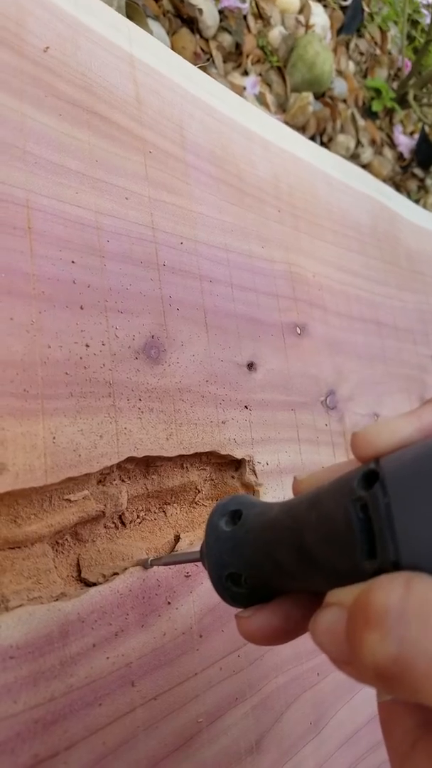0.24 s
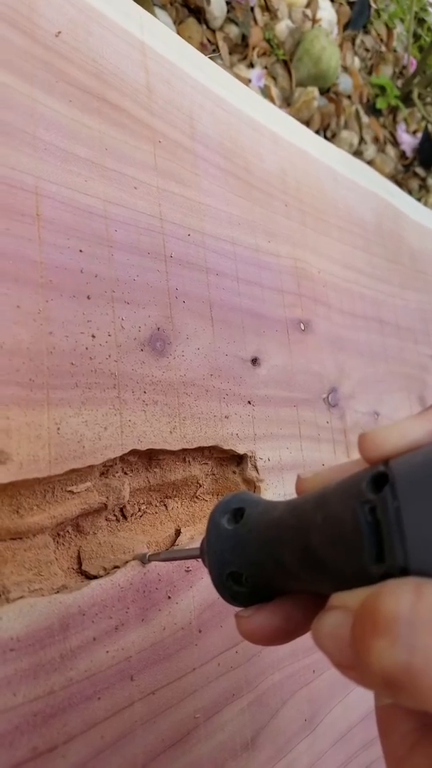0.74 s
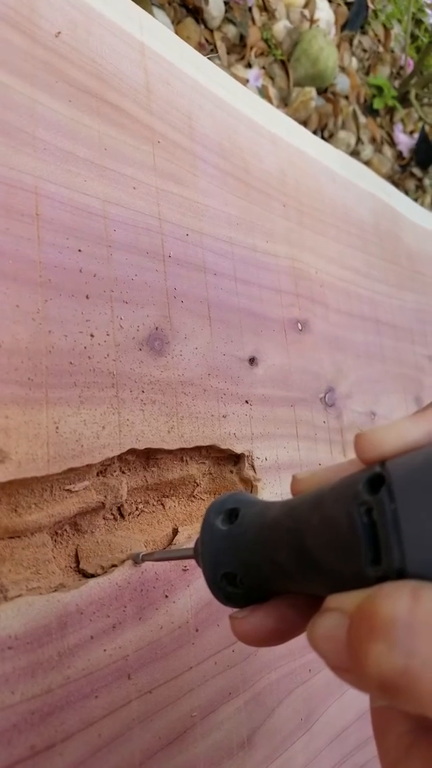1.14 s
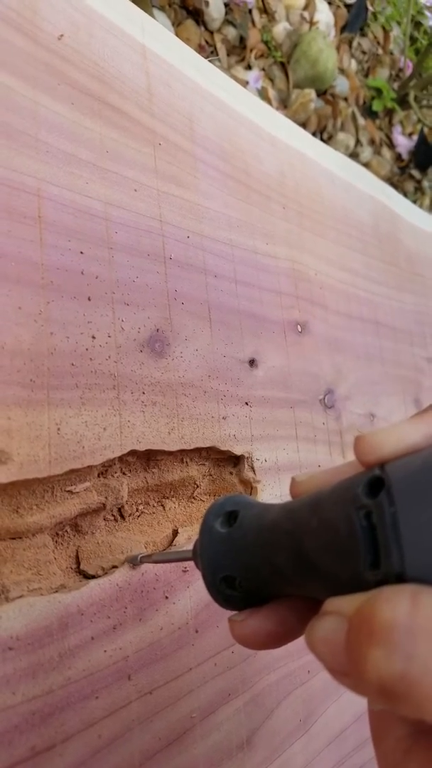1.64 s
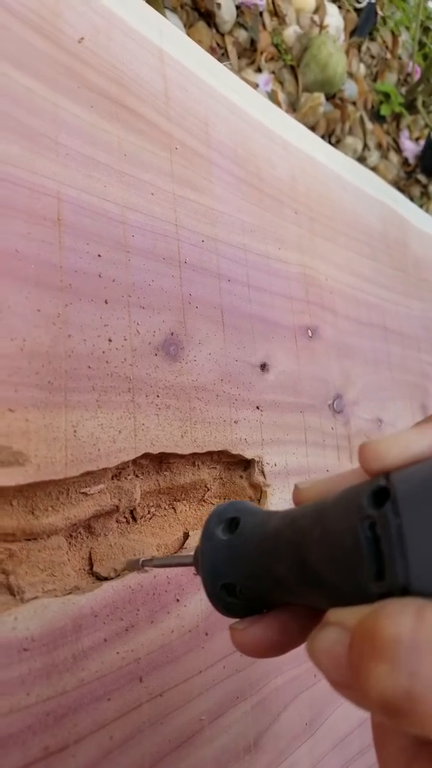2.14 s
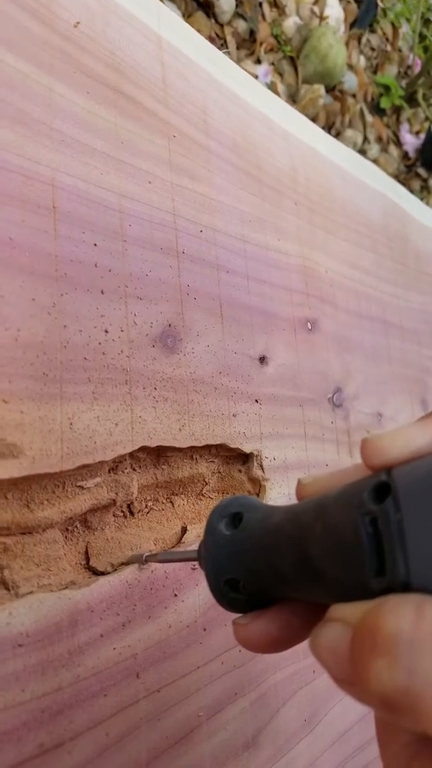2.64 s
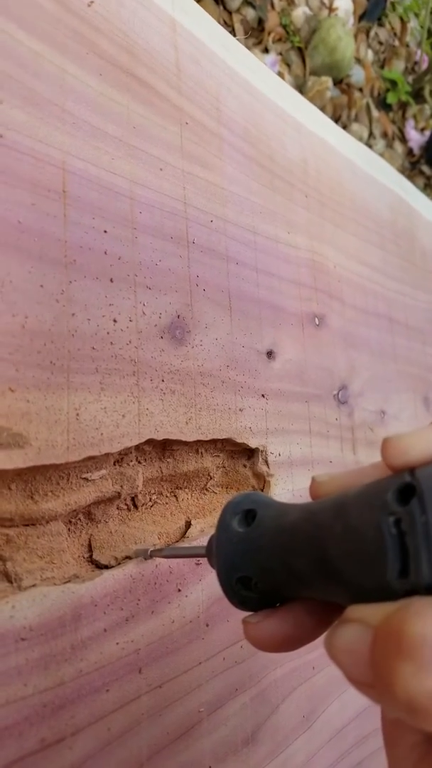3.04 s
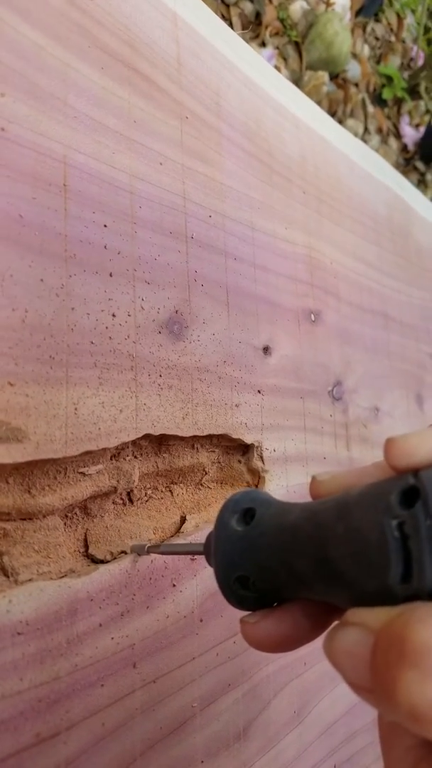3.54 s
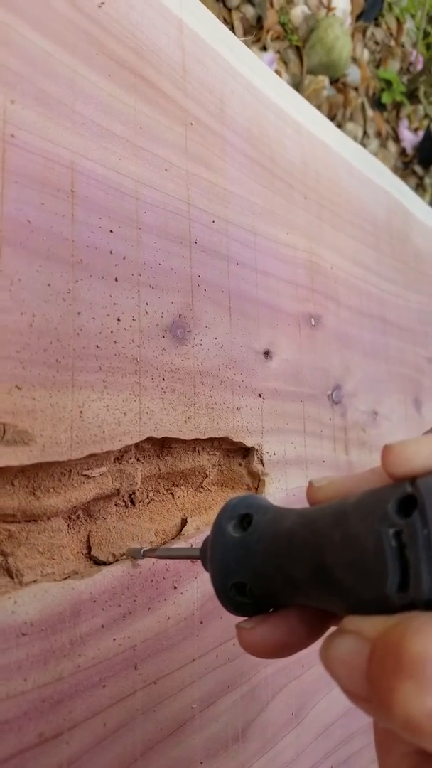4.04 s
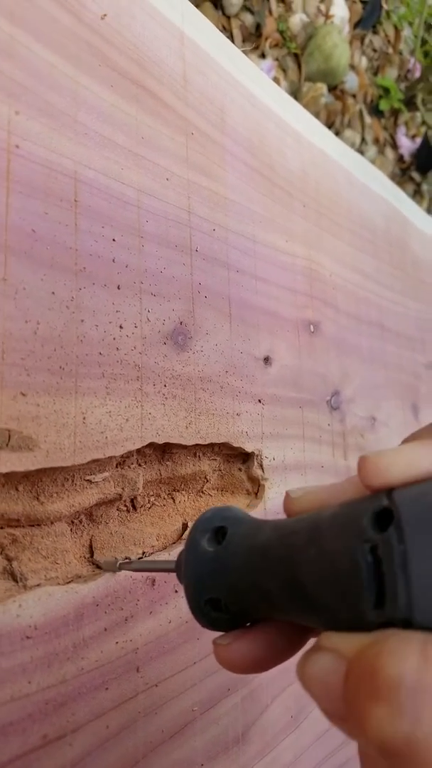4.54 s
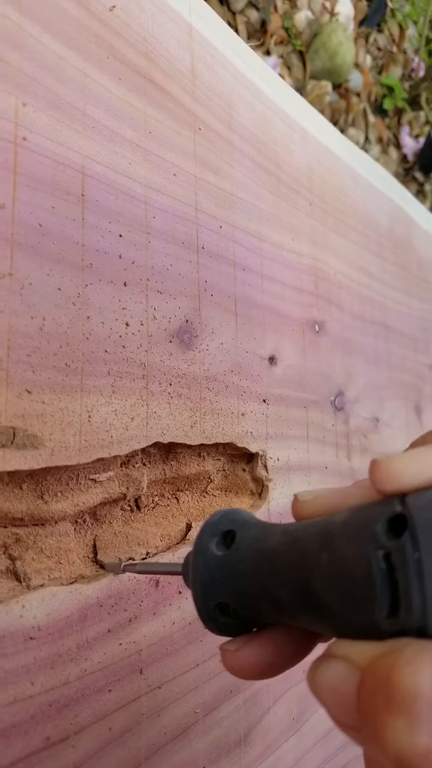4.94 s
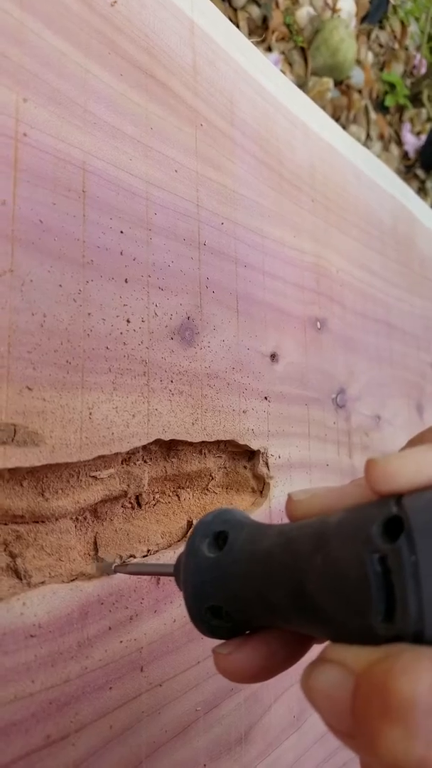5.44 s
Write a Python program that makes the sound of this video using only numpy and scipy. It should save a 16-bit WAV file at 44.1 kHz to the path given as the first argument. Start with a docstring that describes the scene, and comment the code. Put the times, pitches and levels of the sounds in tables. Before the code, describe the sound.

A handheld rotary tool whines and rasps through wood close up, bogging into a harsh squeal once, with faint traffic rumble behind.

```python
"""Outdoors, a handheld rotary tool carves a wooden slab.
The burr knocks as it turns, torn chips rattle slab, shank and housing, and snags add ring and dust.
Multiples of the turn rate make the spindle hum, the slab's drone, the flutes' whine and the shank's squeal.
Behind it, shaped noise makes far traffic rumble and steady drones; gliding notes are a far engine revving."""
import sys
import numpy as np
from scipy import signal
from scipy.fft import rfft, irfft, next_fast_len
from scipy.io import wavfile

SR = 44100
rng = np.random.default_rng(int(sys.argv[2]) if len(sys.argv) > 2 else 0)


def pcm_store(signal):
    """Save signal as 16-bit PCM."""
    levels = np.round(np.clip(np.atleast_2d(signal), -1, 1) * 32767)
    wavfile.write(sys.argv[1], SR, levels.astype(np.int16).T)


N = 250488
SIZE = next_fast_len(N + 4096)
HZ = np.arange(SIZE // 2 + 1) * SR / SIZE
T = np.arange(N) / SR
HALF_SIDE = np.array([[.5], [-.5]])   # left, right


def from_db(db):
    """Amplitude ratio of a level in dB."""
    return 10 ** (np.asarray(db) / 20)


def rms_one(x):
    """Scale to an RMS of 1."""
    return x / np.sqrt(np.mean(x ** 2) + 1e-20)


def in_time(rows):
    """Interpolate each column of a table whose first column is time."""
    s, *columns = np.transpose(rows)
    return [np.interp(T, s, c) for c in columns]


def drift(rate_hz):
    """Slow random wander of RMS 1: noise through a two-pole lowpass."""
    r = np.exp(-2 * np.pi * rate_hz / SR)
    noise = rng.standard_normal(N + 9000)
    return rms_one(signal.lfilter([1], [1, -2 * r, r * r], noise)[9000:])


def swell(start_s, end_s, attack_s, release_s):
    """Gain 0-1: rises after the start, holds, reaches zero at the end."""
    return np.clip((T - start_s) / attack_s, 0, 1) * np.clip((end_s - T) / release_s, 0, 1)


def spells(rows, rest_db, ramp_s):
    """Steady gain at rest_db to which each row (start [s], end [s], added gain [dB]) adds a swell."""
    return from_db(rest_db) + sum(from_db(level_db) * swell(start_s, end_s, ramp_s, ramp_s)
                                  for start_s, end_s, level_db in rows)


def burst(s, level_db, ms):
    """Hann-shaped swell that starts at each time and peaks half its length later."""
    marks = np.zeros(N)
    marks[np.round(s * SR).astype(int)] = from_db(level_db)
    return signal.lfilter(np.hanning(int(ms * SR / 1000) + 2), [1], marks)


# Spindle speed before 0.1 % jitter: (time [s], speed [turns/s])
SPINDLE_SPEED = [(0.0, 158.4), (0.14, 162.4), (0.4, 159.2), (0.58, 161), (0.66, 158.4), (0.84, 162),
                 (0.97, 160.2), (1.04, 146.5), (1.1, 144.4), (1.15, 144), (1.18, 140.4), (1.225, 139.7),
                 (1.31, 141.4), (1.365, 139.6), (1.385, 141.2), (1.43, 139.6), (1.515, 141.6), (1.555, 153),
                 (1.63, 161.5), (1.85, 165.5), (1.88, 173), (1.93, 180.5), (1.96, 174), (2.02, 179),
                 (2.11, 189.5), (2.17, 177), (2.27, 169), (2.42, 165.5), (2.79, 164.5), (2.99, 161.4),
                 (3.47, 160), (3.72, 162.8), (3.88, 160), (4.14, 160), (4.22, 179), (4.25, 172.5),
                 (4.41, 172), (4.46, 177), (4.53, 172.8), (4.61, 165.2), (4.83, 159.6), (5.68, 158.2)]


def spindle():
    """Speed [turns/s] and the jittered turn angle [rad]."""
    speed, = in_time(SPINDLE_SPEED)
    turn = 2 * np.pi * np.cumsum(speed * (1 + .001 * drift(30))) / SR
    return speed, turn


# Burr eases off or skips clear: (off [s], back [s], chip gain [dB])
LIFTS = [(0.33, 0.38, -3), (0.675, 0.722, -3), (1.555, 1.625, -4), (1.853, 1.935, -11.5),
         (2.013, 2.113, -13), (2.125, 2.14, -6), (2.245, 2.275, -6), (2.6, 2.65, -2), (2.75, 2.81, -2),
         (3.1, 3.155, -3), (3.25, 3.325, -4), (3.95, 4.025, -4), (4.125, 4.141, -4), (4.137, 4.168, -9),
         (4.176, 4.222, -14), (4.224, 4.233, -12), (4.236, 4.246, -14), (4.33, 4.37, -4), (4.42, 4.475, -7),
         (4.675, 4.74, -6), (4.855, 4.88, -4), (5.49, 5.513, -4)]


def contact():
    """Chip gain: fades over 12 ms as the burr leaves, returns within 0.72 ms."""
    attack_s, release_s = 0.012, 0.00072
    return from_db(sum(depth_db * swell(off_s, back_s, attack_s, release_s)
                       for off_s, back_s, depth_db in LIFTS))


def chips(turn, per_s, spread_db, bunching):
    """Three streams of uneven clicks, stronger on one side of each turn since the burr runs out of true."""
    size_db = spread_db * np.minimum(rng.exponential(1, (3, N)), 5)
    sizes = from_db(size_db) * rng.choice([-1, 1], (3, N))
    born = rng.random((3, N)) < per_s / SR
    return rms_one(sizes * born * (1 + np.clip(bunching, 0, 1) * np.cos(turn)))


def band(x, low_hz, high_hz):
    """Second-order Butterworth bandpass."""
    return signal.sosfilt(signal.butter(2, [low_hz, high_hz], "band", fs=SR, output="sos"), x)


# Where the tap's edge sharpens: (start [s], end [s], added edge gain [dB])
CRISP_TAPS = [(0, .25, 6), (1.55, 1.85, 6), (2.42, 3.3, 7), (3.2, 4.0, 8), (4.25, 5.68, 3)]


def knocks(turn, touching, runout):
    """A tap each turn; in the wood each flute also bites, with its own slowly changing strength."""
    flutes, tap_spread_db, scrape_ms = 9, 2, 5
    turns = (turn // (2 * np.pi)).astype(int)
    # in the wood no two turns tap alike
    force = from_db(tap_spread_db * touching * rng.standard_normal(N)[turns])
    tap = rms_one(np.diff(turns, prepend=0)) * force
    soft = signal.sosfilt(signal.butter(2, 3200, fs=SR, output="sos"), tap)
    # the edge is a short scrape, the same on every turn; it reaches the housing's 7 kHz ring
    edge = band(tap, 3300, 4700) + from_db(5) * band(tap, 5600, 8300)
    scrape = rng.standard_normal(int(scrape_ms * SR / 1000))
    edge = signal.fftconvolve(edge, scrape / np.linalg.norm(scrape))[:N]
    tap = soft + touching ** 2 * spells(CRISP_TAPS, rest_db=-2, ramp_s=.05) * edge
    flute = (flutes * turn // (2 * np.pi)).astype(int)
    strengths = np.array([drift(4.5) for _ in range(flutes)])
    strength = strengths[flute % flutes, np.arange(N)]
    bites = rms_one(np.diff(flute, prepend=0) * strength)
    bite_share = np.clip(touching * (1 - runout), 0, 1)
    return np.sqrt(1 - bite_share) * tap + np.sqrt(bite_share) * bites


# Burr snags on hard grain: (time [s], relative ring level [dB], relative dust level [dB])
SNAGS = [(0.017, 4, -14), (0.0434, 2, -33), (0.239, -13, -17), (0.285, 2, -9), (0.289, 2, -18),
         (0.309, 0, -28), (0.3223, 5, -20), (0.5817, -5, -23), (0.6245, 0, -9), (0.731, 2, -9),
         (0.9, 0, -25), (0.943, 0.5, -21), (0.9852, 2, -28), (1.007, 4, -17), (1.02, 3, -10),
         (1.0263, 1, -19), (1.057, 2, -28), (1.0637, -4, -24), (1.0838, 2, -12), (1.0896, 1, -11),
         (1.1079, 3, -9.5), (1.1414, 5.5, -13), (1.154, 1, -18), (1.2106, 4, -17), (1.2823, 0, -20),
         (1.3105, 6, -29), (1.3886, 1, -19), (1.4038, 3, -16), (1.4314, 2, -27), (1.4738, 8, -8),
         (1.5152, 3, -10), (1.825, 1, -22), (1.8435, -3, -28), (1.939, -5, -20.5), (1.963, -6, -30),
         (1.976, -8, -32), (2.114, -2, -32), (2.1517, -1, -30), (2.1576, -1, -10), (2.1685, 0, -21),
         (2.173, -16, -22), (2.5621, -6, -22), (2.938, 0, -10), (2.944, -7, -11), (2.951, -11, -25),
         (3.112, 0, -27), (3.1617, 0, -15), (3.1748, 0, -16), (3.689, -3, -21), (3.7, 4, -26),
         (3.7115, 2, -29), (3.726, -7, -29), (3.8805, 4, -12), (3.911, -5, -15), (4.032, 3, -24),
         (4.0932, -8, -21), (4.134, -2, -21), (4.169, -11, -31), (4.1726, -16, -33), (4.222, 1, -19),
         (4.2336, 4, -25), (4.2506, -13, -32), (4.5194, 3, -15), (4.7825, 1, -14), (4.89, 1, -30),
         (5.008, -13, -14), (5.1259, 3.5, -15), (5.3334, -2, -16), (5.352, 4, -8), (5.3635, -2, -17),
         (5.39, -4, -29), (5.414, 1, -18), (5.4453, 7, -16), (5.533, -9, -25), (5.5378, 9.5, -31),
         (5.644, 0, -27)]


def snags():
    """Stick-slips at the shank's own pitch, and a noise spray of dust."""
    snag_s, ring_db, dust_db = np.transpose(SNAGS)
    judder = burst(snag_s, ring_db, ms=2.63) * np.sin(2 * np.pi * 2300 * T)
    spray = burst(snag_s, dust_db, ms=5.5) * rng.standard_normal(N)
    return judder, spray


def body(modes, shared, own, trail):
    """Modes add in power, ring partly alike and partly independently left and right.
    trail (0-1) scales the ring's causal phase lag behind the blow."""
    alike, apart, total, lead = 0, 0, 1e-9, 0
    for hz, width_hz, level_db, pan_db, lead_rad, share in modes:
        off = ((HZ + 1) / hz - hz / (HZ + 1)) * hz / width_hz
        power = from_db(2 * level_db) / (1 + off ** 2) ** 3
        heard = power * from_db(2 * pan_db * HALF_SIDE)
        share = np.clip(share, 0, 1)
        alike = alike + share * heard
        apart = apart + (1 - share) * heard
        total = total + power
        lead = lead + lead_rad * power
    cepstrum = irfft(np.log(total) / 2, SIZE)
    cepstrum[SIZE // 2:] = 0      # folding to positive lags gives the phase of a causal ring
    phase = 2 * np.clip(trail, 0, 1) * rfft(cepstrum).imag
    both = np.sqrt(alike) * np.exp(1j * HALF_SIDE * lead / total) * rfft(shared, SIZE)
    both = both + np.sqrt(apart) * rfft(own, SIZE)
    ring = irfft(both * np.exp(1j * phase), SIZE)[:, :N]
    return ring / np.sqrt(np.mean(alike + apart))


# Bite of the burr, relative levels: (time [s], chips [dB], treble above chips [dB],
# slab above chips [dB], knocking above chips [dB])
BITE = [(0.0, -22, -5.5, -5, -12), (0.3, -20.5, -5.5, -8, -13.5), (0.6, -20.5, -1.5, -7, -13.5),
        (0.8, -24.5, -5.5, -7, -8.5), (0.95, -27, -2.5, -5.5, -3), (1.09, -18, -2, -9.5, -11.5),
        (1.5, -22, 0, -8.5, -12.5), (1.58, -24, -5, -7, -12), (1.7, -26.5, -7.5, -4, -9),
        (1.82, -23, -5.5, -4, -13), (1.87, -24.5, -11, -3.5, -10.5), (1.92, -26.5, -11, -4, -7),
        (1.97, -28, -7, 1.5, -29), (2.03, -26.5, -7.5, -2, -13), (2.1, -22, -11, -3.5, -13),
        (2.16, -22, -7.5, 0, -20), (2.35, -23.5, -5.5, -6, -19), (2.56, -24.5, -4.5, -6, -8.5),
        (2.66, -26, -2, -7, -7.5), (2.85, -27.5, -1, -6, -7.5), (2.95, -23.5, -1.5, -7.5, -7),
        (3.36, -21, -3.5, -7, -17), (3.55, -25, -6, -4, -9), (3.9, -22.5, -6.5, -4.5, -10.5),
        (4.1, -20.5, -6, -4.5, -10), (4.26, -25, -8.5, 0, -17.5), (4.35, -25.5, -7, 0.5, -13),
        (4.45, -25.5, -9, -1.5, -14), (4.56, -23, -8, -3.5, -14), (4.68, -23.5, -1, -4.5, -11),
        (4.8, -20, -6, -5.5, -12), (4.9, -23, -7.5, -7, -9), (5.05, -25, -5, -6.5, -7.5),
        (5.27, -21.5, -7.5, -4.5, -12), (5.36, -18, -8, -4, -8.5), (5.68, -22, -8, -2, -32)]
# Resonances: (centre [Hz], about twice the half-power width [Hz], relative level [dB],
# left over right [dB], left phase lead [rad], left-right likeness [0-1])
SLAB_MODES = [(832, 200, -4.5, -2, .1, 0.2), (1055, 252, 2.5, 3, 0.9, 1), (1435, 605, 5, 3.5, 1.3, 1),
              (1760, 1000, 7, 5, 1.7, 0)]
SHANK_MODES = [(2120, 120, 0.5, -17, -1.5, 0.73), (2288.4, 390, 7, -2, 0.35, .9),
               (2558, 324, 0, -11.5, -1, 0.83), (2776, 365, -4, 9.5, -0.34, 0.86),
               (3346, 267, -9, -16.5, 1, 1), (3636, 680, -3.5, 2, 4, 0.9), (4260, 1140, -8.5, -3, 4, 0.8)]
HOUSING_MODES = [(5200, 680, -5.5, 6, 2.69, 1), (5875, 1050, -1.5, -3.5, 3.87, 0.12),
                 (6910, 390, 5, 1, 11.1, 0.093), (6914, 1200, -3.5, 10.5, 10.9, 0.067),
                 (7520, 760, 6, -2.5, 17.4, 0.056), (7940, 630, -5, 8, 34, 0.11),
                 (9570, 1100, -19, -5, 26, 0.62), (11100, 5700, -9.5, -4, 16.93, 0.33),
                 (12500, 640, 2, -13, 20.6, 0.69), (13900, 5700, -7.5, -6.5, 21.7, 0.17),
                 (15000, 600, -8, 10, 57, 0.36)]


def cutting(turn):
    """Chip stream, and per body its modes, chip gain and blows from knocks and snags."""
    cut_db, treble_db, slab_db, knock_db = in_time(BITE)
    touching = contact()
    bite_db = cut_db + 1.71 * drift(9.9)      # the hand's pressure is never even
    # the small negative power lifts the knock slightly as the chips fade
    knock = knocks(turn, touching, runout=.65) * from_db(knock_db) * touching ** -.05
    stream = chips(turn, per_s=6000.0, spread_db=2.0, bunching=.2) * from_db(0.6 * drift(30))
    judder, spray = snags()
    slab = from_db(bite_db + slab_db - 1.5)
    slab_blows = slab * from_db(9.5) * knock * touching ** 0.14 + from_db(-12.0) * spray
    shank_blows = from_db(bite_db + 5.5) * knock + from_db(-23.5) * judder
    housing_gain = from_db(bite_db + treble_db + 2.0) * touching ** 0.89
    housing_blows = spray + from_db(bite_db + 3) * knock
    return stream, [(SLAB_MODES, slab * touching, slab_blows),
                    (SHANK_MODES, from_db(bite_db - 0.5) * touching, shank_blows),
                    (HOUSING_MODES, housing_gain, housing_blows)]


def bodies(stream, parts):
    """Chips and blows ring slab, shank and housing."""
    out = 0
    for modes, gain, blows in parts:
        grains = stream * gain * from_db(1.31 * drift(18.7))
        out = out + body(modes, grains[0] + blows, grains[1:], trail=0.37)
    return out


# Spindle hum: (multiple of the turn rate, peak level at 160.5 turns/s before flicker [dB])
UNBALANCE = [(1, -52), (2, -54), (3, -55.5), (4, -57)]


def spindle_hum(speed, turn):
    """Unbalance sounds low multiples of the turn, stronger the faster it spins."""
    db_per_turn_per_s, flicker_db, out = 0.15, 2.5, 0
    for multiple, level_db in UNBALANCE:
        level_db = level_db + db_per_turn_per_s * (speed - 160.5) + flicker_db * drift(4.3)
        out = out + from_db(level_db) * np.sin(round(multiple) * turn)
    return out


# Where the drone swells: (start [s], end [s], added gain [dB])
DRONES = [(2.454, 2.574, -46), (3.957, 4.175, -42.5), (4.324, 4.58, -36.5), (5.412, 5.53, -44)]


def slab_drone(turn):
    """Low drone of the slab: 5 and 6 times the turn rate."""
    tones = .5 * np.sin(5 * turn) + np.sin(6 * turn)
    return spells(DRONES, rest_db=-49.5, ramp_s=.04) * tones


# Relative noise spectrum: (frequency [Hz], density [dB per Hz])
TRAFFIC_SPECTRUM = [(15, -42), (25, -22), (40, -15.5), (108, -1.5), (183, -5.5), (262, -10.5), (319, -10.5),
                    (379, -14.5), (482, -17), (572, -19), (750, -20.5), (980, -55), (1650, -120)]
# Rumble before slow wander: (time [s], RMS level [dB])
RUMBLE_LEVEL = [(0.0, -41.5), (1.47, -46), (1.66, -43), (5.62, -41), (5.68, -39)]


def traffic():
    """Distant rumble: shaped noise, nearly alike on both sides in the bass."""
    hz, density_db = np.transpose(TRAFFIC_SPECTRUM)
    colour = from_db(np.interp(np.log(HZ + 1), np.log(hz), density_db))
    mid, side = rfft(rng.standard_normal((2, N)), SIZE) * colour
    side = side * np.clip(HZ / 536, .05, .8)
    rumble = rms_one(irfft([mid + side, mid - side], SIZE)[:, :N])
    return from_db(in_time(RUMBLE_LEVEL)[0] + 0.51 * drift(0.64)) * rumble


# Steady far drones: (centre [Hz], width of one filter pass [Hz], RMS level [dB])
HUMS = [(104.3, 8.8, -51), (174, 61, -53.5)]


def hums():
    """Noise passed twice through narrow resonances."""
    out = 0
    for hz, width_hz, level_db in HUMS:
        b, a = signal.iirpeak(hz, hz / width_hz, SR)
        once = signal.lfilter(b, a, rng.standard_normal(N))
        out = out + from_db(level_db) * rms_one(signal.lfilter(b, a, once))
    return out


# A far engine revs: (start [s], end [s], first pitch [Hz], last pitch [Hz], full RMS level before pan [dB])
ENGINE_REVS = [(0.106, 1.248, 65, 49, -44), (1.75, 2.3, 59, 45, -55), (2.5, 3.2, 61, 57, -59),
               (3.1, 4.05, 53, 53, -47.5), (4.3, 4.9, 61, 63, -47), (4.85, 5.298, 49, 53, -52),
               (5.264, 6.003, 50.4, 83, -40)]


def engine():
    """Each rev is one sine that glides, swells and fades, slightly to the left."""
    swell_s, fade_s, out = 0.15, 0.19, 0
    for start_s, end_s, first_hz, last_hz, level_db in ENGINE_REVS:
        pitch_hz = np.interp(T, [start_s, end_s], [first_hz, last_hz])
        note = np.sin(2 * np.pi * np.cumsum(pitch_hz) / SR)
        out = out + from_db(level_db) * swell(start_s, end_s, swell_s, fade_s) * note
    return np.sqrt(2) * out * from_db(2.4 * HALF_SIDE)


# Flutes sing while the burr glides evenly: (start [s], end [s], added gain [dB])
WHINES = [(0.17, 0.3, -36), (0.4, 0.6, -32), (0.66, 0.99, -38.5), (1.62, 1.84, -34), (2.29, 2.65, -39),
          (2.6, 2.93, -40.5), (2.88, 3.17, -36), (3.18, 3.42, -35.5), (3.37, 3.94, -31.5),
          (4.02, 4.13, -36), (4.5, 4.69, -32), (4.8, 5.36, -30)]
# Throb deepens: (start [s], end [s], added depth [dB])
THROB_SWELLS = [(2.3, 2.95, 3.5), (3.45, 3.78, -1), (3.78, 3.94, 7), (5.08, 5.37, 2.5)]


def flute_whine(turn):
    """Nine flutes sound 9 times the turn rate, throbbing once and twice a turn as the burr runs untrue."""
    gain = spells(WHINES, rest_db=-46.5, ramp_s=0.062)
    gain = gain * from_db(2.0 * drift(66)) * from_db(3 * HALF_SIDE)
    throb = 0.65 * np.cos(turn + 2.2) + 0.5 * np.cos(2 * turn + 1.9)
    gain = gain * (1 + spells(THROB_SWELLS, rest_db=-6.0, ramp_s=0.063) * throb)
    return np.sqrt(2) * gain * np.sin(9 * turn + 0.48 * np.sin(turn + 4.7) + 1.1 * HALF_SIDE)


def squeal(turn):
    """Under heavy load the shank squeals near 24 times a turn, with its octave; a fainter tail follows."""
    order, sway_rad, throb = 24, .55, .45
    wavering = turn + 0.035 * drift(21)      # the shank twists, so the tone wavers
    sway = sway_rad * np.sin(wavering)       # splits the squeal into strands
    low = from_db(-20.5 + 1.5 * drift(34)) * np.sin(order * wavering + sway + 2.2 * HALF_SIDE)
    octave = from_db(-25.5 + 2.0 * drift(30)) * np.sin(2 * order * wavering + sway)
    loaded = swell(0.99, 1.55, attack_s=0.1, release_s=0.025)
    # trails upward with the speed as the burr frees
    loaded = loaded + from_db(-14) * swell(1.53, 1.65, attack_s=.03, release_s=.03)
    return loaded * (low + octave) * (1 + throb * np.cos(wavering))


def tool():
    """One turn angle drives the cutting noise and every tone of the tool."""
    speed, turn = spindle()
    stream, parts = cutting(turn)
    out = squeal(turn) + bodies(stream, parts)
    return out + flute_whine(turn) + slab_drone(turn) + spindle_hum(speed, turn)


def scene():
    """Tool over traffic, drones and engine."""
    return tool() + traffic() + hums() + engine()


def record(dry):
    """Peaks clip hard at 0.85; a steep lowpass cuts above 15.75 kHz."""
    lowpass = signal.ellip(12, .5, 70, CUTOFF_HZ := 15750, fs=SR, output="sos")
    return signal.sosfilt(lowpass, np.clip(dry, -.85, .85))


dry = scene()
out = record(dry)
pcm_store(out)
```